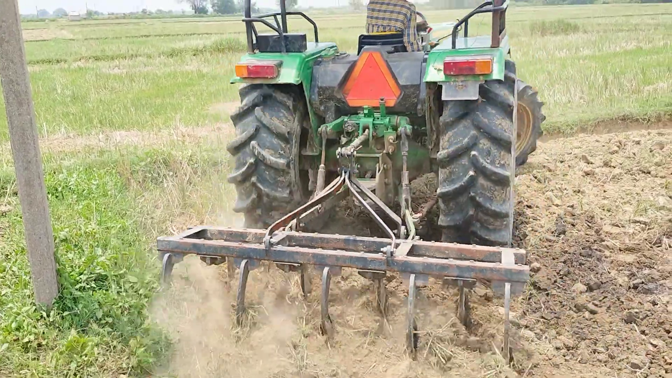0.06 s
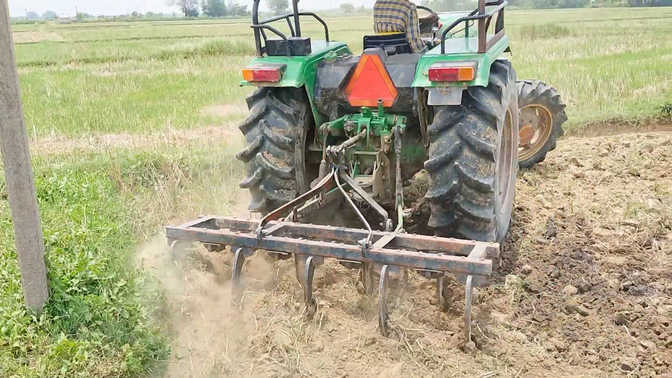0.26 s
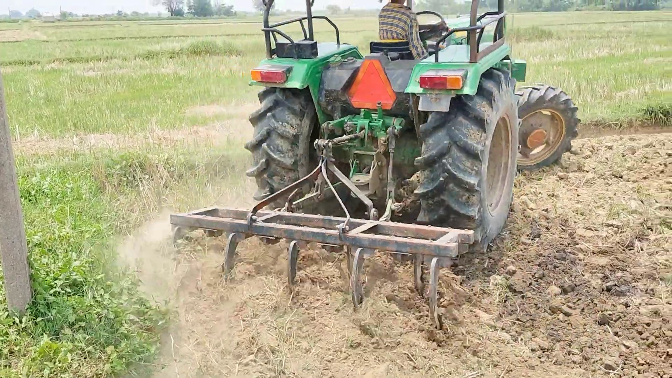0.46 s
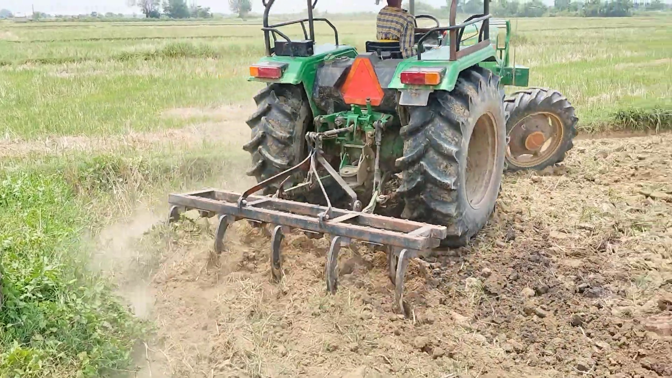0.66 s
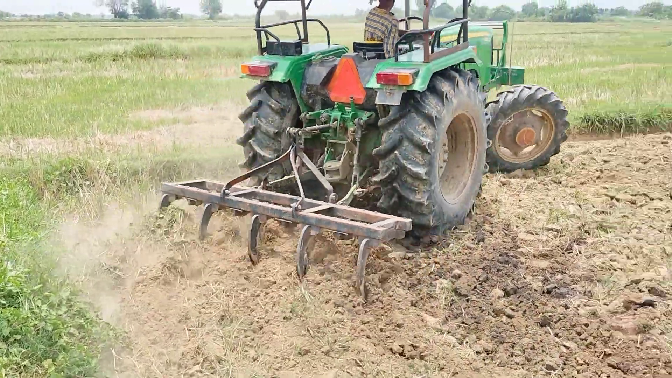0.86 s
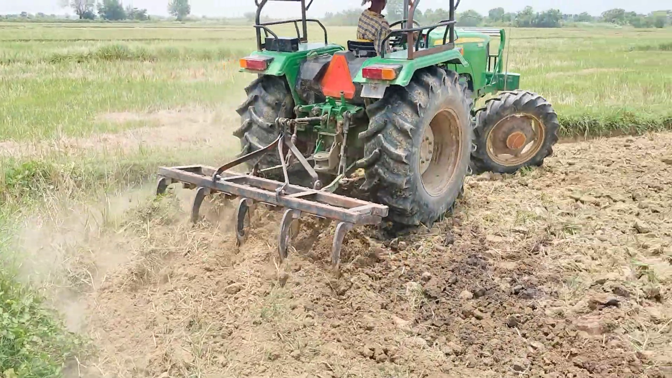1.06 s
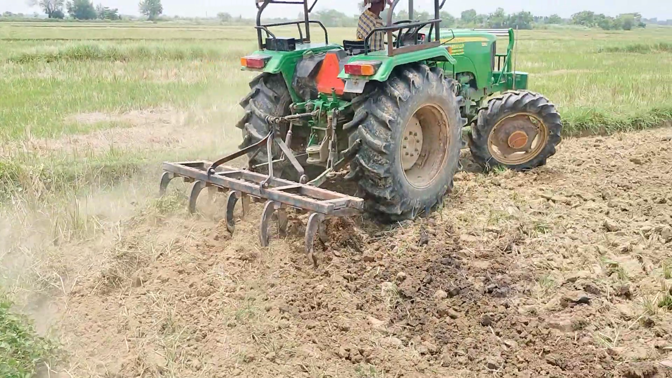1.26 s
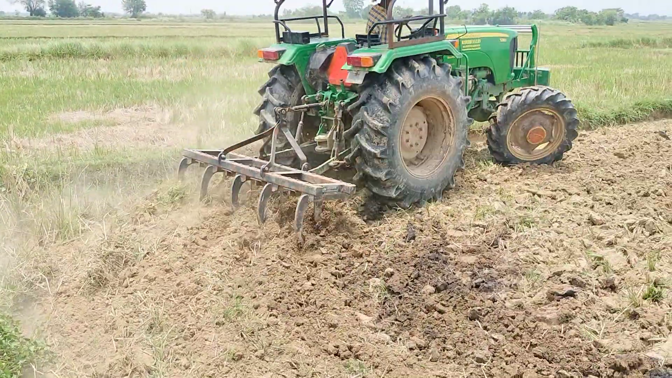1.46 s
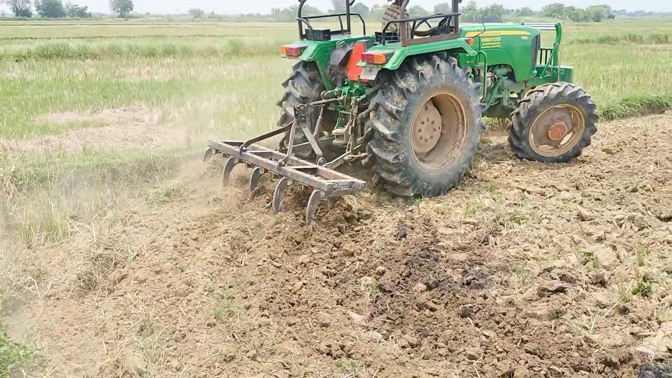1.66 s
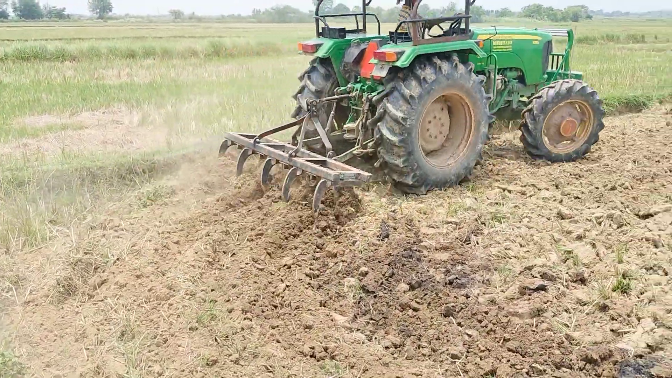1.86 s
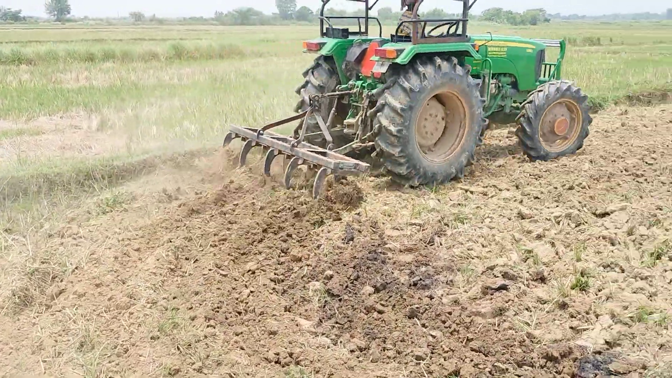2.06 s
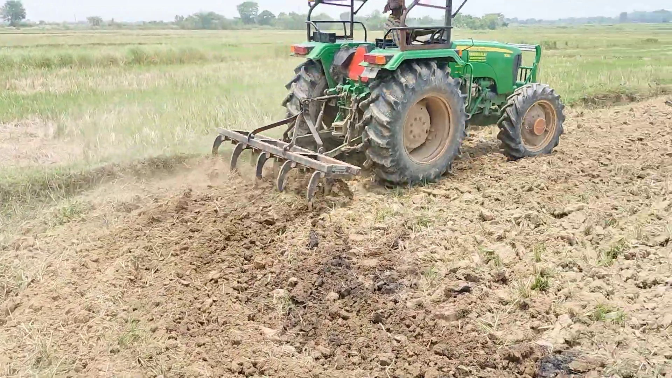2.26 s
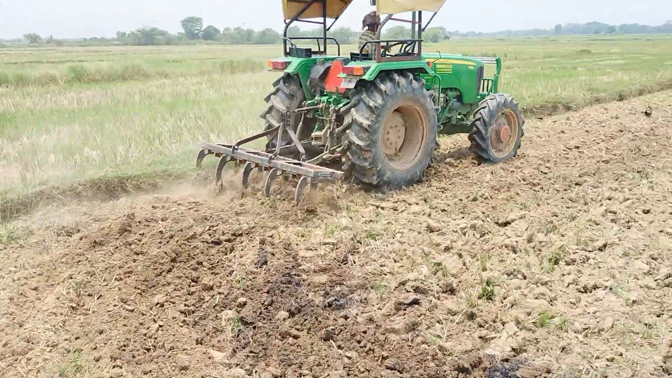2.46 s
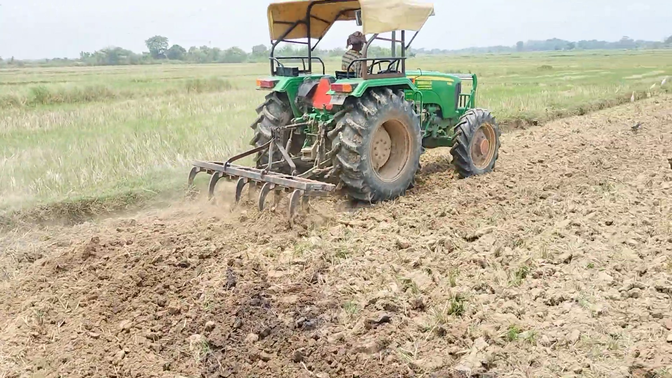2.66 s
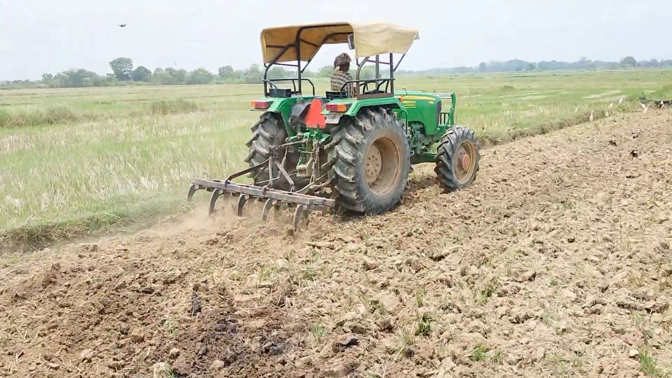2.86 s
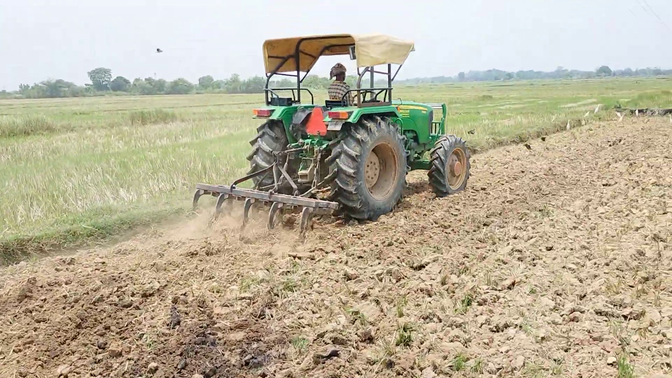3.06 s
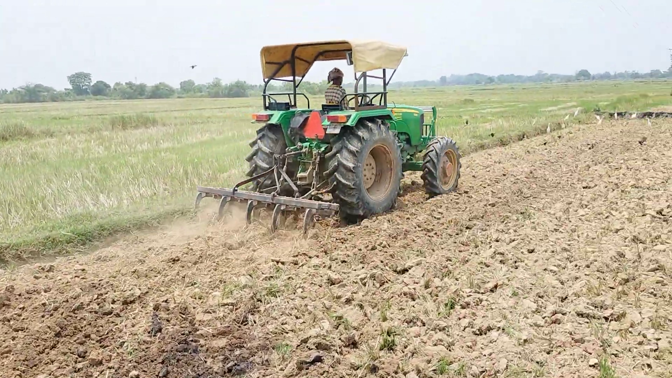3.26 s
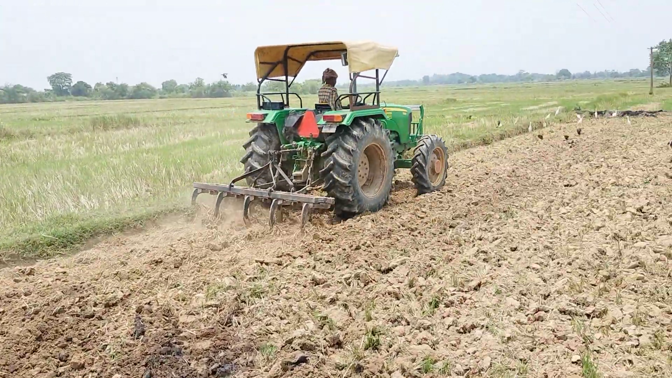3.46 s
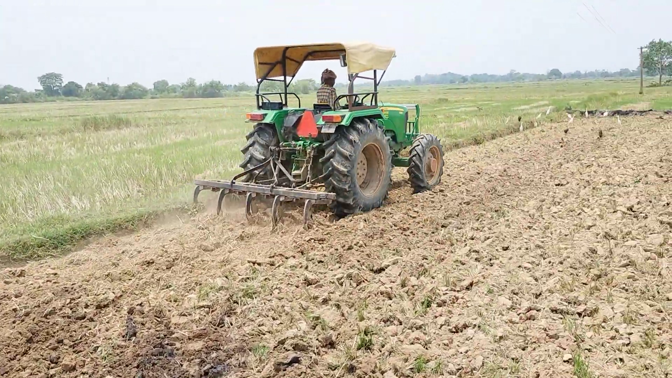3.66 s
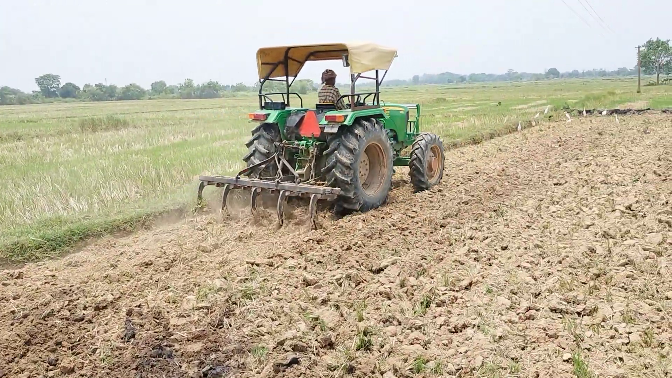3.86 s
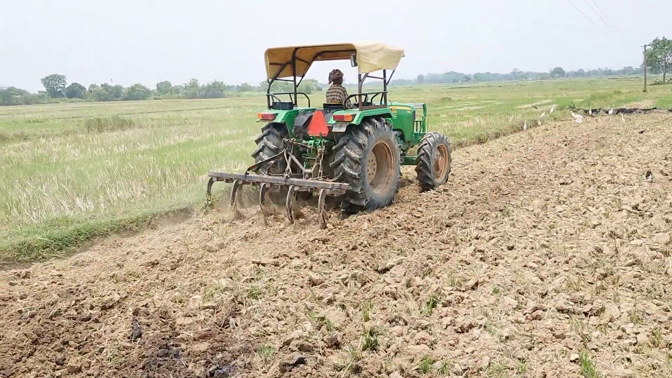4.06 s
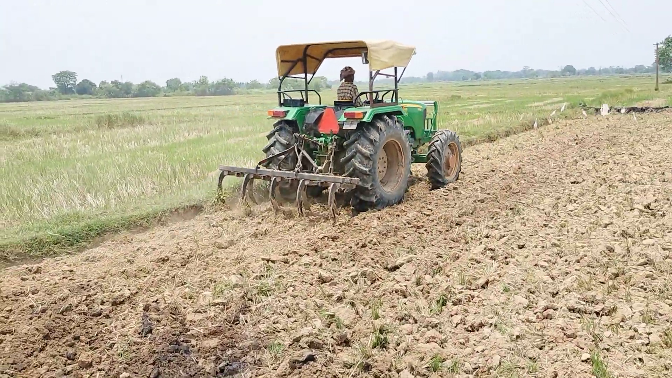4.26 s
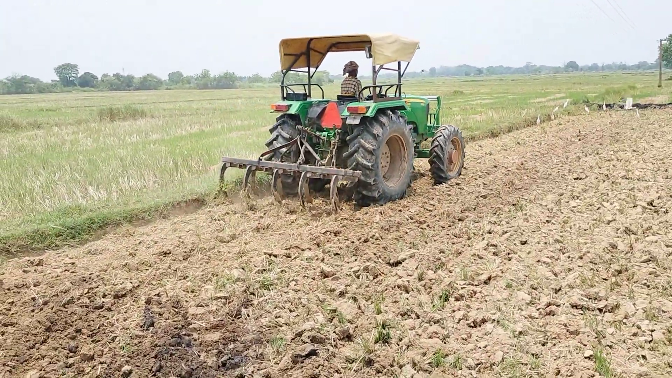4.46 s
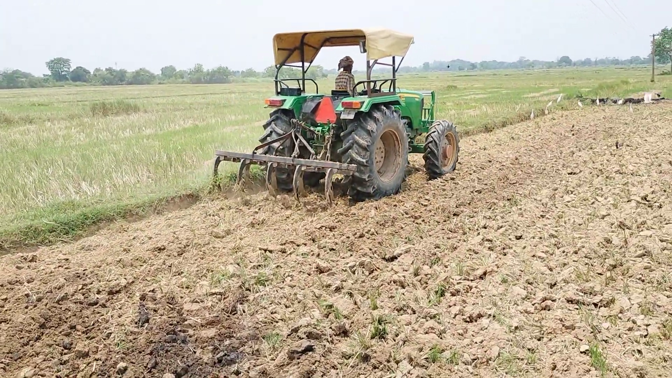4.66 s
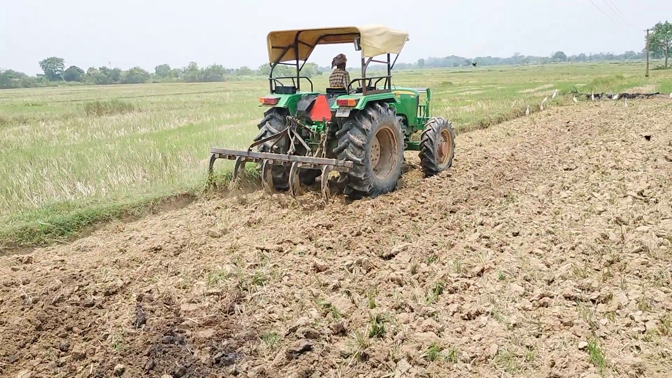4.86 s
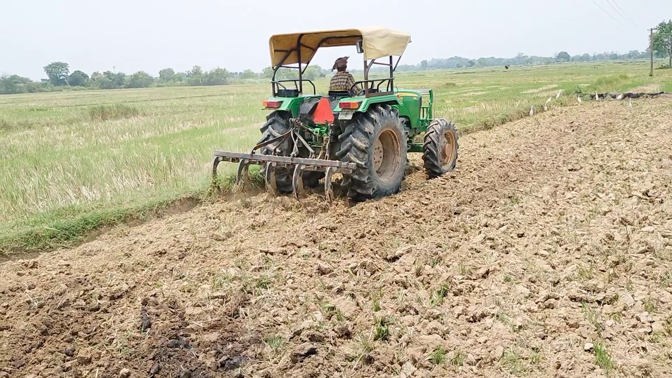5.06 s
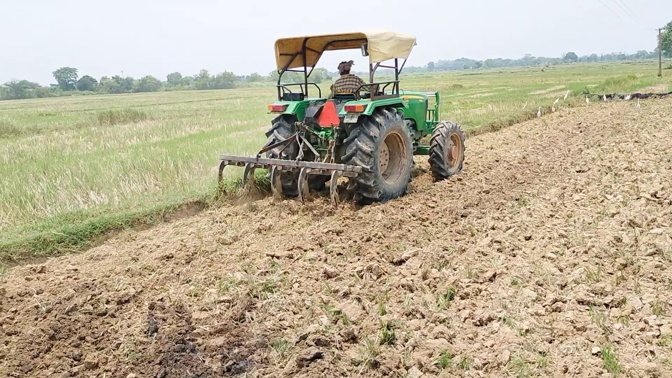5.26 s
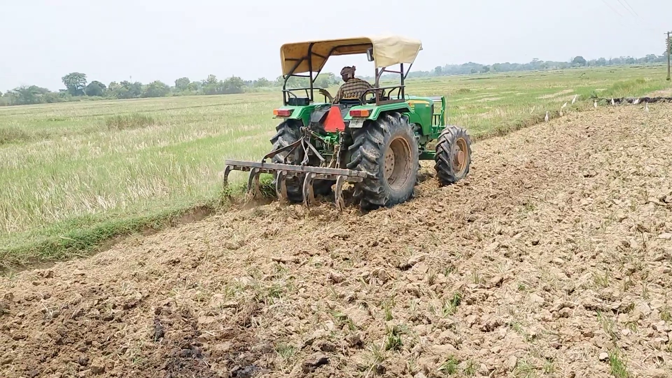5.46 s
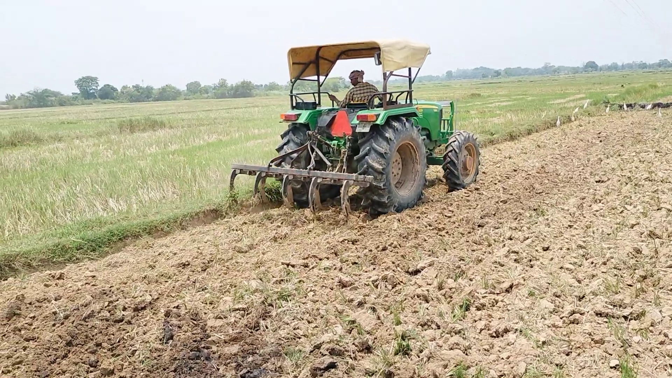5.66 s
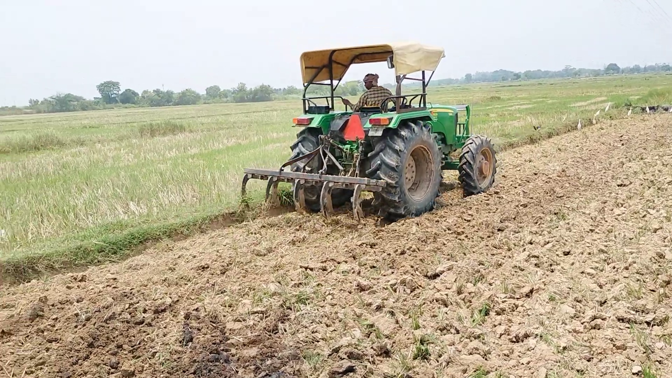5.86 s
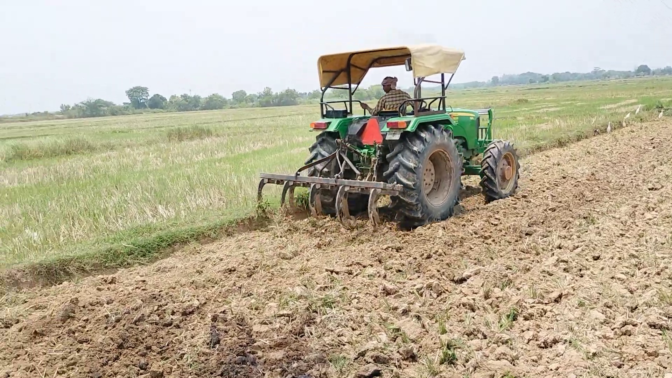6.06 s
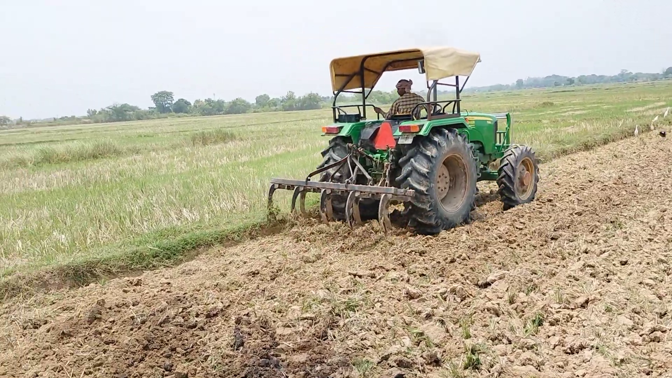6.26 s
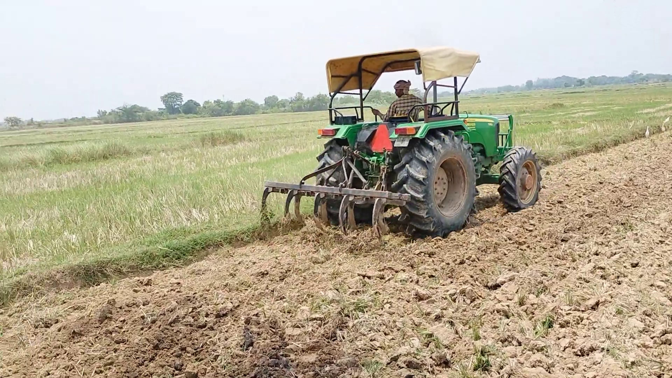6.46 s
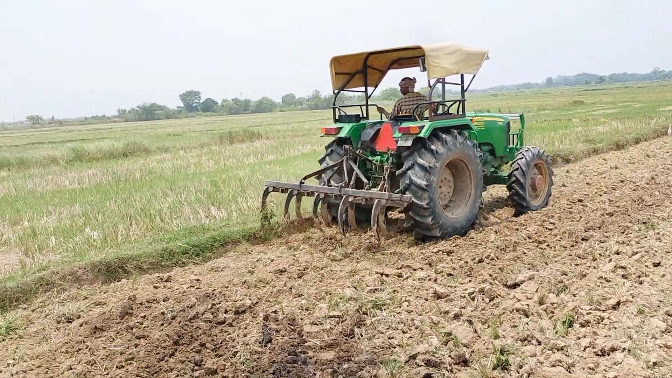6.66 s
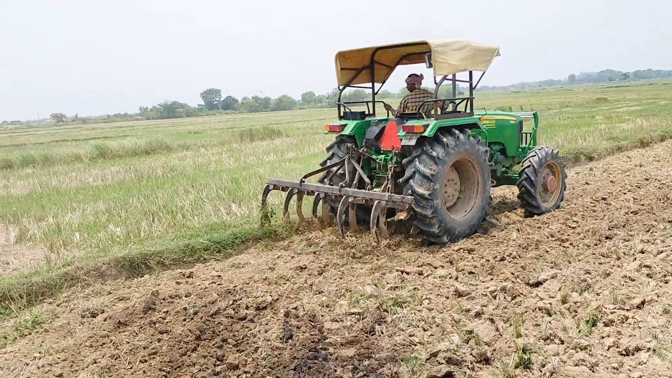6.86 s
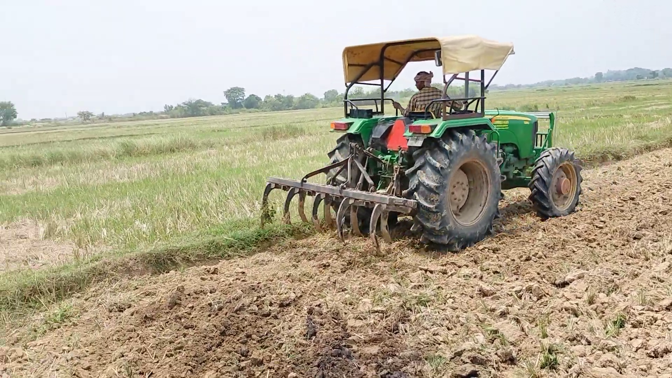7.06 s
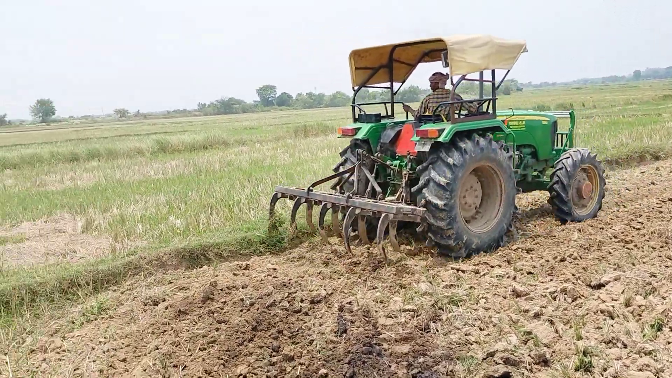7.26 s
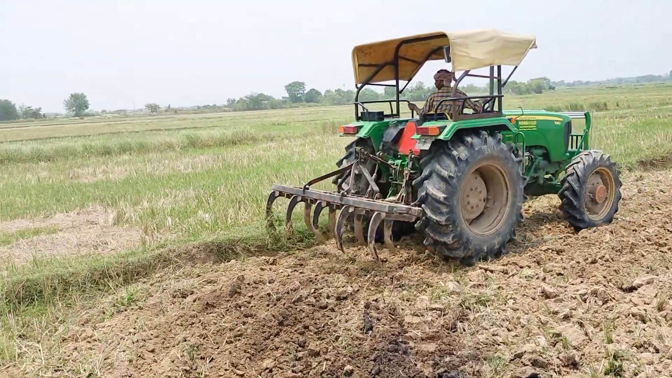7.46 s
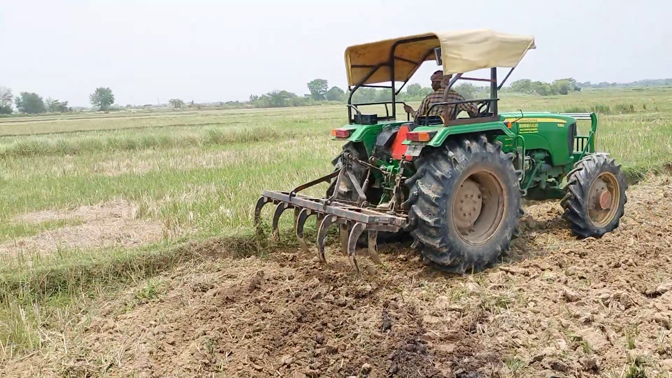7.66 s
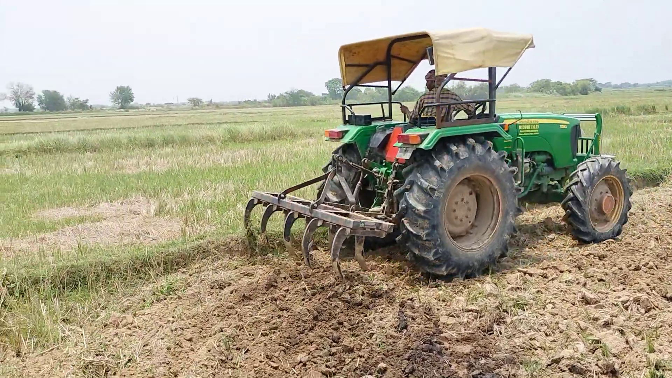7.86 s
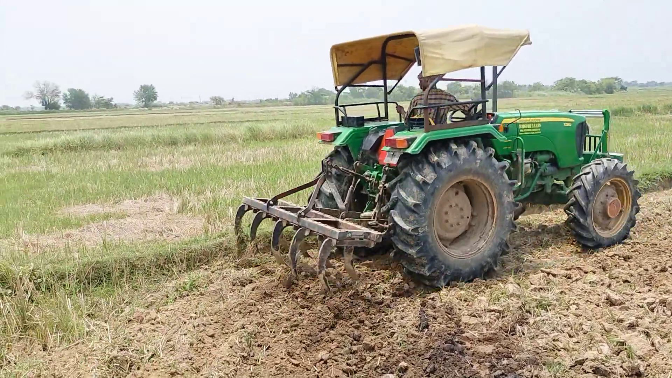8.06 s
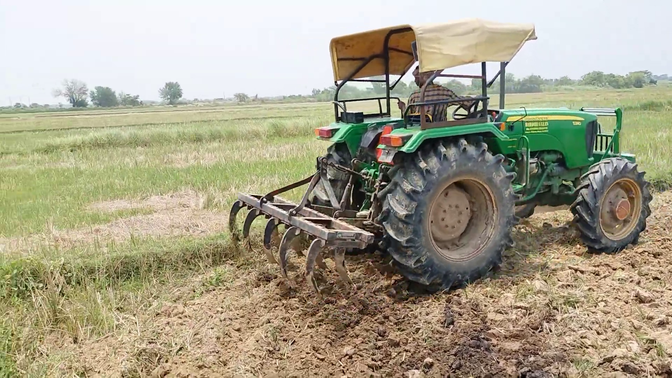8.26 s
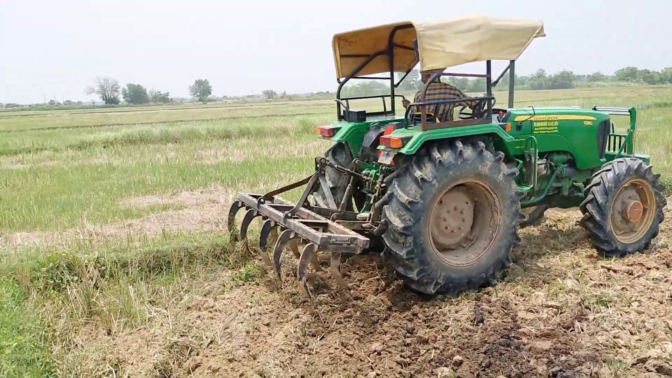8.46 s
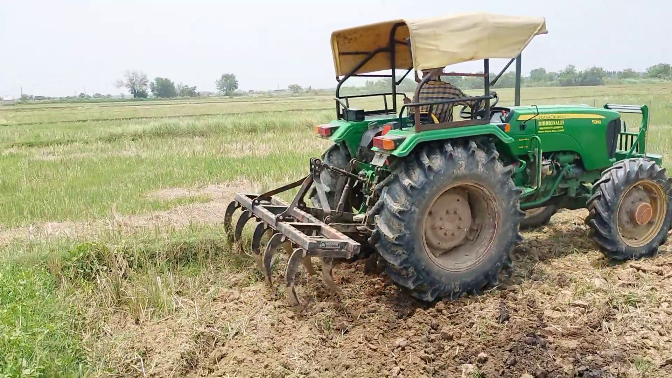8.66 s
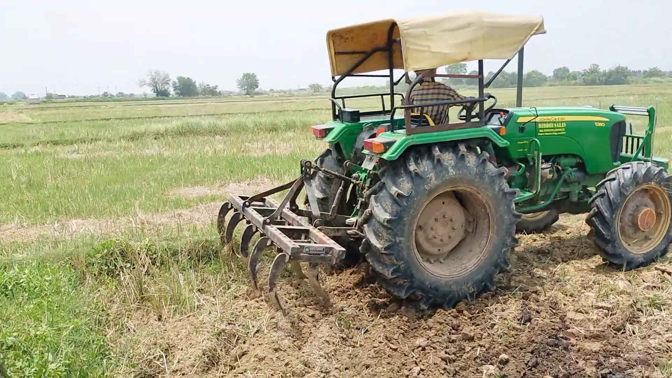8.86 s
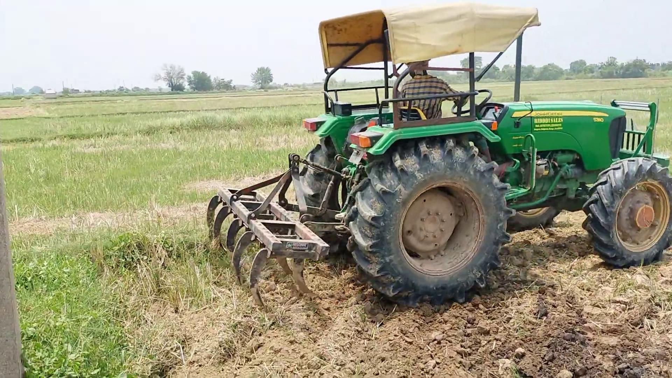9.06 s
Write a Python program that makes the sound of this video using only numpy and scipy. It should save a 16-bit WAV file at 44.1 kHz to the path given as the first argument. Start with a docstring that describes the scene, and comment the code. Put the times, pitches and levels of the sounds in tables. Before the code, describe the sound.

A diesel tractor drones and clatters close by as a cultivator crunches dry soil, then moves off and returns amid wind buffeting and birdsong.

```python
"""Tractor and cultivator on a windy field

Gusts rumble and slap on two microphone ports: shaped noise, plus single damped swings for big eddies.
Small birds whistle, trill and buzz: gliding sines with a weak second harmonic and a short diffuse tail.
A cultivator breaks dry clods (filtered noise bursts), rasps through ringing tines, squeaks and thuds.
A diesel tractor moves off and backs up again: crank-locked sines and rattles with a ground reflection."""
import sys
import numpy as np
from scipy import signal
from scipy.fft import rfft, irfft, next_fast_len
from scipy.io import wavfile
from scipy.ndimage import uniform_filter1d, minimum_filter1d

SR = 44100
rng = np.random.default_rng(int(sys.argv[2]) if len(sys.argv) > 2 else 0)


def wav_record(signal):
    """Record a signal, one row per channel, as 16-bit PCM in the file named by sys.argv[1]."""
    frames = np.transpose(np.atleast_2d(signal))
    bounded = np.clip(frames, -1, 1)
    # unit amplitude maps onto the largest positive 16-bit level
    quanta = np.round(bounded * 32767).astype(np.int16)
    wavfile.write(sys.argv[1], SR, quanta)


N = 401751
TIME = np.arange(N) / SR   # s


def from_db(db):
    """Decibels to gain."""
    return 10 ** (np.asarray(db) / 20)


def rms_one(x):
    """Scale to unit power."""
    return x / np.sqrt(np.mean(x ** 2) + 1e-20)


def in_time(rows):
    """Draw each column of a breakpoint table as a curve over every sample."""
    s, *columns = np.transpose(rows)
    return [np.interp(TIME, s, column) for column in columns]


def at_hz(points, hz):
    """Read a table on a log-frequency axis."""
    f, value = np.transpose(points)
    return np.interp(np.log(hz + 1), np.log(f), value)


def coloured(x, spectrum):
    """Equalise a sound with a spectrum table and bring it to unit power."""
    size = next_fast_len(N)
    gain = from_db(at_hz(spectrum, np.fft.rfftfreq(size, 1 / SR)))
    return rms_one(irfft(rfft(x, size) * gain, size)[..., :N])


def drift(rate_hz):
    """Slow random wander with unit power, drawn every 40 samples and joined by straight lines."""
    step, settle = 40, 2000
    r = np.exp(-2 * np.pi * rate_hz * step / SR)
    draws = rng.standard_normal(N // step + settle + 2)
    slow = signal.lfilter([1], [1, -2 * r, r * r], draws)[settle:]
    return np.interp(np.arange(N) / step, np.arange(len(slow)), rms_one(slow))


def spread(pair, alike):
    """Mix two unrelated sounds into a left and a right of given likeness."""
    c = np.clip(alike, -1, 1)
    middle = np.sqrt((1 + c) / 2) * pair[0]
    side = np.sqrt((1 - c) / 2) * pair[1]
    return middle + side * [[1], [-1]]


def noise(alike):
    """White stereo noise; alike 0 is independent, 1 is mono."""
    return spread(rng.standard_normal((2, N)), alike)


def panned(left_db):
    """Left and right gains of constant power for a left-right level difference."""
    gains = from_db(np.array([[.5], [-.5]]) * left_db)
    return gains / np.sqrt(np.mean(gains ** 2, axis=0))


def delayed(x, ms):
    """Play a sound a little later."""
    return np.interp(TIME - ms / 1000, TIME, x)


def decaying(hits, fall_s):
    """Let every hit die away exponentially; unit power overall."""
    return rms_one(signal.lfilter([1], [1, -np.exp(-1 / (fall_s * SR))], hits + 1e-18))


def bandpass(x, band_hz):
    """Keep one pitch range."""
    return signal.sosfilt(signal.butter(2, band_hz, "band", fs=SR, output="sos"), x)


# large eddies that strike a port:
# [t/s, swing f/Hz, swing level/dB, flutter level/dB, left-right difference/dB]
BUFFETS = [(2.913, 126, -5, -29, 18), (2.964, 149, 0, -21, 21), (3.245, 124, -7.5, -24, 17),
           (3.975, 121, -9, -30, 25), (4.217, 90, -2.5, -13.5, 8), (4.298, 129, 0.5, -18.5, 14),
           (4.322, 38, -2, -24, -18), (4.377, 69.6, -9, -20, 18), (4.427, 253, -6, -10.5, 21),
           (4.564, 60.5, -5, -12, 11), (4.622, 70, 0.5, -22, 20), (4.664, 130, -3, -14.5, 16),
           (4.724, 260, -1.5, -20, 18), (4.83, 91, -7, -17, -3), (4.935, 200, -9, -10.5, 17),
           (4.997, 150, -3, -8, 14), (5.091, 130, 1, -7.5, 17), (5.133, 90, -1, -14, 18),
           (5.262, 61, -4, -26, -18), (5.382, 161, 1.5, -16, 13), (5.621, 79.5, -8, -19.5, -16),
           (5.955, 75.5, -6.5, -15, -13), (6.066, 200, -13, -17, 21), (6.245, 80.6, -2, -13, 6),
           (6.421, 141, 4, -14, 13), (7.046, 66, -7, -24, -25), (7.139, 104, -6.5, -18, 17),
           (7.671, 150, -10, -12.5, 20), (8.124, 60, -8, -22, 24), (8.169, 140, -5, -17, 22)]
# colour of slaps and flutter: [f/Hz, relative level/dB]
SLAP = [(40, -30.5), (150, 3), (300, -1.5), (550, -17), (900, -35.5), (6000, -92.5)]
SWING_DAMPING, FLUTTER_S = 2.8, 0.0086   # decay per cycle, time to the flutter's peak in s


def buffets():
    """A large eddy is a single damped swing of pressure, torn by a short flutter of noise."""
    out, t = np.zeros((2, N)), TIME[:SR // 5]
    flutter = coloured(rng.standard_normal(N), SLAP)
    for s, hz, swing_db, flutter_db, left_db in BUFFETS:
        span = slice(int(s * SR), int(s * SR) + len(t))
        age = SWING_DAMPING * hz * t
        swing = rng.choice([-1, 1]) * age * np.exp(1 - age) * np.sin(2 * np.pi * hz * t)
        tear = flutter[span] * t / FLUTTER_S * np.exp(1 - t / FLUTTER_S)
        sides = panned(left_db)
        eddy = from_db(swing_db) * swing + from_db(flutter_db) * tear
        out[:, span] += eddy * sides / sides.max()
    return out


# wind on each port before gusts and overload: [t/s, rumble level/dB, slap level/dB]
WIND_LEFT = [(2.72, -40, -46), (2.95, -18, -29), (3.12, -16, -27), (3.25, -20, -34), (3.55, -19, -24.5),
             (3.75, -30, -36), (3.88, -18.5, -32), (4.2, -34, -42), (4.23, -13.5, -21), (4.47, -20, -23.5),
             (4.57, -7, -9.5), (4.76, -18, -21.5), (5.08, -11, -14), (5.25, -19, -16.5),
             (5.47, -14.5, -21.5), (5.87, -27.5, -37), (6.28, -11.5, -21.5), (6.44, -14, -19),
             (6.8, -25, -44), (7.55, -36, -47), (7.72, -22, -39), (8.35, -29.5, -40), (8.55, -19.5, -28.5),
             (8.85, -20.5, -31), (9, -47, -55)]
WIND_RIGHT = [(2.35, -44, -61), (2.55, -26, -41), (3, -22.5, -28.5), (3.7, -26, -37), (4.19, -29, -26.5),
              (4.24, -17.5, -23.5), (4.6, -16.5, -21), (4.88, -17, -14.5), (5.15, -17.5, -19.5),
              (5.6, -28, -19), (5.72, -22.5, -23), (5.95, -12.5, -19), (6.07, -18.5, -22.5),
              (6.45, -14, -18), (6.75, -14.5, -21.5), (6.8, -27, -32), (7.5, -52, -57)]
# lulls between the buffets: [t/s, length/s]
LULLS = [(4.48, 0.023), (4.698, 0.034), (4.73, .03), (5.326, .04), (5.725, 0.024), (6.526, .04)]
# colour of the deep rumble: [f/Hz, relative level/dB]
RUMBLE = [(12, -15), (25, -11.5), (45, -3.5), (90, -2), (180, -9.5), (320, -24.5), (900, -60), (4000, -100)]
# colour of the bright edge on the slaps: [f/Hz, relative level/dB]
EDGE = [(150, -32), (400, -1.5), (600, -8.5), (900, -17.5), (1600, -46), (6000, -86.5)]
LULL_DEPTH_DB = 5.5   # before the lull's corners are smoothed
GUSTINESS_DB, GUSTS_HZ = 1.77, 3.1   # spread and rate of the wander
WIND_TOP = .78   # pressure where a port saturates


def wind(lumps_db, slaps_per_s, slap_s, steady, edge_db, edge_growth):
    """Eddies rumble and slap on each port separately; the harder the slaps, the brighter their edge."""
    rumble_db, slap_db = np.stack([in_time(WIND_LEFT), in_time(WIND_RIGHT)], axis=1)
    lulls = sum(1.0 * (TIME > s) * (TIME < s + length) for s, length in LULLS)
    gusts_db = GUSTINESS_DB * np.array([drift(GUSTS_HZ), drift(GUSTS_HZ)])
    gusts_db = gusts_db - LULL_DEPTH_DB * uniform_filter1d(lulls, size=SR // 80)
    lumps = rms_one(from_db(lumps_db * np.array([drift(32), drift(26)])))
    rumble = coloured(noise(0), RUMBLE) * lumps
    hits = (rng.random((2, N)) < slaps_per_s / SR) * rng.uniform(0.91, 1, (2, N))
    eddies = steady + decaying(hits, slap_s)
    force = from_db(slap_db + gusts_db)
    slaps = force * coloured(noise(0) * eddies, SLAP)
    edge = from_db(edge_db) * force ** edge_growth * coloured(noise(0) * eddies, EDGE)
    pressure = from_db(rumble_db + gusts_db) * rumble + slaps + edge + buffets()
    return WIND_TOP * np.tanh(pressure / WIND_TOP)   # the hardest eddies overload the ports


BIRD_ECHO_DB, BIRD_ECHO_S = -6.5, 0.014   # tail level, decay time


def scattered(x):
    """The rough field adds a short, diffuse tail, different at each port."""
    tail = rng.standard_normal((2, SR // 8)) * np.exp(-TIME[:SR // 8] / BIRD_ECHO_S)
    tail = tail / np.sqrt(np.sum(tail ** 2, axis=1, keepdims=True))
    return from_db(BIRD_ECHO_DB) * signal.fftconvolve(x[None], tail, axes=1)[:, :N]


# Bird levels are those of the dry note, before tail and panning.
# gliding whistles: [t/s, length/s, start f/Hz, end f/Hz, level/dB]
WHISTLES = [(2.668, 0.032, 5200, 6100, -33.5), (2.829, 0.13, 2100, 2500, -38),
            (3.223, 0.042, 3100, 2840, -40.5), (3.308, 0.05, 2180, 2570, -41.5),
            (3.594, 0.039, 4020, 3890, -35.5), (3.662, 0.051, 4180, 4030, -38),
            (3.692, 0.03, 3630, 3870, -34.5), (3.732, 0.072, 3000, 2860, -42.5),
            (3.779, 0.15, 1976, 2630, -40.5), (3.949, 0.078, 2910, 2570, -41.5),
            (4.535, 0.043, 3000, 2870, -49), (5.375, 0.053, 3000, 2600, -46),
            (5.613, 0.036, 3900, 3930, -42.5), (5.685, 0.058, 3810, 3870, -41),
            (5.928, 0.039, 4630, 4620, -37), (6.006, .04, 3630, 3480, -33.5),
            (6.193, 0.068, 4130, 3880, -42), (6.203, 0.013, 3340, 3020, -37), (6.24, .034, 7200, 3630, -46),
            (6.27, 0.047, 3300, 2730, -44), (6.804, 0.13, 3050, 3640, -35.5), (6.858, .13, 3790, 3970, -42),
            (6.912, .03, 5700, 4950, -39), (6.928, 0.07, 4860, 4600, -35.5),
            (7.431, 0.058, 2930, 2890, -33), (7.622, .057, 1980, 2100, -36), (8.113, 0.17, 2320, 3100, -39),
            (8.232, 0.092, 3280, 3165, -31), (8.507, 0.088, 3340, 2810, -35),
            (8.881, 0.033, 2750, 2345, -41), (8.952, 0.081, 2330, 2650, -48)]
# trills, each pulse gliding onto one note from above (+) or below (-):
# [t/s, length/s, f/Hz, level/dB, pulse rate/Hz, leap as a share of pitch]
TRILLS = [(5.326, 0.044, 4320, -37, 66, 1), (5.651, 0.039, 4000, -40, 54, -.3),
          (5.965, 0.055, 3930, -37, 48, -0.6), (6.843, 0.02, 4430, -40, 100, -.2),
          (7.511, 0.077, 3570, -33, 41, .4), (8.797, 0.047, 3410, -35, 91, -0.44),
          (8.863, 0.023, 3340, -31, 50, 0.75)]
# harsh buzzes: [t/s, length/s, centre f/Hz, level/dB]
BUZZES = [(3.912, 0.053, 5400, -47), (5.155, 0.047, 4940, -49), (5.55, 0.055, 4900, -50),
          (6.061, 0.046, 5460, -44), (6.128, 0.085, 3920, -44), (6.512, 0.055, 5670, -51),
          (8.191, 0.046, 4000, -41), (9.028, 0.044, 4660, -50)]
# strength of the second harmonic: [f/Hz of that harmonic, level/dB against the fundamental]
OVERTONE = [(6500, -23), (7500, -18), (7900, -16), (8600, -14), (9300, -39), (11000, -31)]
TRILL_SETTLE = .2   # time constant of the glide, as a share of a pulse
BUZZ_HZ, BUZZ_DEPTH = 75, 0.26   # sweep rate, sweep up and down as a share of pitch
BIRD_WOBBLE, BIRD_FLUTTER_DB = 0.011, 3.5   # spread of pitch as a share, spread of level
PULSE_UNEVEN = 0.1   # spread of the pulse rate, as a share


def birds():
    """Whistles glide, trills glide onto their note again and again, buzzes sweep down in uneven pulses."""
    out = np.zeros(N)
    waver, flutter = drift(100), from_db(BIRD_FLUTTER_DB * drift(80))

    def during(s, length):
        """The samples of one note."""
        return slice(int(s * SR), int(s * SR) + int(length * SR))

    def pulsing(span, per_s):
        """Position 0-1 within each uneven pulse."""
        return np.cumsum(per_s * (1 + PULSE_UNEVEN * waver[span])) / SR % 1

    def add(span, hz, db, envelope):
        """Sing one note with a weak second harmonic."""
        cycles = np.cumsum(hz * (1 + BIRD_WOBBLE * waver[span])) / SR
        phase = 2 * np.pi * cycles + np.cumsum(rng.normal(0, 0.038, len(hz)))
        tone = np.sin(phase) + from_db(at_hz(OVERTONE, 2 * hz)) * np.sin(2 * phase)
        out[span] += from_db(db) * rms_one(tone * envelope * flutter[span])

    for s, length, start, end, db in WHISTLES:
        size = int(length * SR)
        add(during(s, length), np.geomspace(start, end, size), db, signal.windows.tukey(size, .6))
    for s, length, hz, db, per_s, leap in TRILLS:
        span = during(s, length)
        sweep = pulsing(span, per_s)
        glide = hz * (1 + leap * np.exp(-sweep / TRILL_SETTLE))
        add(span, glide, db, np.sin(np.pi * sweep ** 2) * signal.windows.tukey(len(sweep), .15))
    for s, length, hz, db in BUZZES:
        span = during(s, length)
        sweep = pulsing(span, BUZZ_HZ)
        fall = hz * (1 + BUZZ_DEPTH * (1 - 2 * sweep))
        add(span, fall, db, np.sin(np.pi * sweep) * signal.windows.tukey(len(sweep)))
    both_ports = np.array([out, delayed(out, 0.054)])
    return (both_ports + scattered(out)) * panned(-4.0)


# the tractor moves off and backs up again: [t/s, distance/m]
DISTANCE = [(0, 4.18), (1, 4.6), (1.6, 4.9), (2.7, 5.1), (3.5, 8.2), (4.7, 11.7), (5.5, 6.5), (6.3, 5.52),
            (7.2, 5.62), (8, 5.5), (9.11, 5.73)]
# how hard the tines work in the ground: [t/s, load 0-1]
LOAD = [(0, 1), (.75, 0.93), (1.15, 0.81), (2, 0.67), (2.45, 0.39), (4, 0.09), (7.3, 0.38), (8, 0.07),
        (9.11, 0.06)]
# crankshaft speed: [t/s, turn rate f/Hz]
SPEED = [(0, 29.5), (.3, 30.3), (.53, 28.6), (.7, 29.4), (.9, 27.7), (1.1, 27.9), (1.6, 32.1), (1.95, 31),
         (2.2, 33), (2.45, 31.4), (3.1, 35.2), (5, 34.5), (6, 29.6), (6.9, 32.3), (7.55, 32.9), (7.8, 34.6),
         (8.3, 34), (9.11, 34)]
USUAL_M, USUAL_TURNS_PER_S = 6, 32


def loudness(rule):
    """Gain of one part of the rig from its distance, load and engine speed."""
    db, distance_db, load_db, speed_db = rule
    (metres,), (load,), (speed,) = in_time(DISTANCE), in_time(LOAD), in_time(SPEED)
    lost_db = distance_db * np.log2(metres / USUAL_M)
    return from_db(db - lost_db + load_db * load + speed_db * (speed - USUAL_TURNS_PER_S))


# colour of the breaking soil: [f/Hz, relative level/dB]
SOIL = [(600, -10), (1500, 3.5), (3000, 5.5), (5000, -8), (7000, -12.5), (9000, -30.5), (11500, -22),
        (16000, -25)]
# pitch ranges of large to tiny clods: [lowest f/Hz, highest f/Hz]
CLOD_BANDS = [(200, 2200), (2200, 4000), (4000, 6500), (6500, 18000)]
# soil loudness: [level/dB at usual distance and speed without load, loss/dB per doubling of distance,
# gain/dB at full load, gain/dB per extra turn per s]
SOIL_LEVEL = (-41.5, 10, 4, 1.28)


def soil(clods_per_s, size_db, crumble_s, hiss):
    """Dry clods snap and crumble in milliseconds, each in the pitch range of its size, over dust hiss."""
    load, = in_time(LOAD)
    busy = load ** 2 * from_db(4.5 * drift(10))   # more clods break while the tines are deep
    out = 0
    for band in CLOD_BANDS:
        born = rng.random(N) < clods_per_s * busy / SR
        snaps = born * from_db(size_db * np.minimum(rng.exponential(1, N), 3))
        out = out + bandpass(noise(0.032) * (decaying(snaps, crumble_s) + hiss), band)
    return loudness(SOIL_LEVEL) * coloured(out, SOIL)


def bursts(rows, rise_s, fall_s):
    """Envelope of contacts that rise quickly, hold and die away."""
    out = np.zeros(N)
    for s, length, db in rows:
        start = int(s * SR)
        t = TIME[:N - start][:SR]
        fall = np.exp(-np.maximum(t - length, 0) / fall_s)
        out[start:][:len(t)] += from_db(db) * (1 - np.exp(-t / rise_s)) * fall
    return out


def crackle(ragged_db, rate_hz):
    """Chips of every size break off at their own moments, so each band flares separately."""
    edges = np.geomspace(500, 16000, 11)
    chips = 0
    for band in zip(edges, edges[1:]):
        flare = from_db(ragged_db * np.minimum(drift(rate_hz), 1.5))
        chips = chips + bandpass(noise(0), band) * flare
    return rms_one(chips)


def resonance(x, hz, width):
    """Ring a two-pole band-pass with unit gain on top."""
    r = np.exp(-np.pi * width / SR)
    feedback = [1, -2 * r * np.cos(2 * np.pi * hz / SR), r * r]
    return signal.lfilter((1 - r * r) / 2 * np.array([1, 0, -1]), feedback, x)


# tines scraping through hard clods: [t/s, hold length/s, relative level/dB]
SCRAPES = [(.235, 0.034, -30), (.28, 0.055, -30.5), (.5, 0.024, -29), (.538, 0.0075, -27.5),
           (.662, 0.0068, -22.5), (1.248, 0.013, -30), (1.315, 0.0089, -32), (1.522, 0.0099, -22.5),
           (1.541, 0.0076, -21.5), (1.552, 0.018, -35), (1.698, 0.013, -28.5), (1.888, 0.0045, -30.5),
           (1.975, 0.042, -30.5), (4.035, 0.051, -33.5)]
# colour of the scrape: [f/Hz, relative level/dB]
SCRAPE = [(600, 12.5), (1500, 4), (2600, 9.5), (4700, 1.5), (6000, -4), (7500, -10), (9000, -39),
          (11000, -16.5), (16000, -49)]
# ringing modes of the spring tines: [f/Hz, width/Hz, relative level/dB]
TINES = [(1800, 76, 7), (2545, 26, 11.5), (3480, 40, 5), (3850, 170, -1), (5040, 26, -7), (5700, 43, -14)]
# steel joints squeaking: [t/s, length/s, f/Hz, peak level/dB]
SQUEAKS = [(0.272, 0.038, 9100, -45), (0.467, 0.12, 2510, -31.5), (0.535, 0.013, 5450, -33),
           (0.701, 0.062, 2580, -34), (0.801, 0.069, 2570, -31), (1.464, 0.13, 4700, -39),
           (1.63, 0.027, 5370, -27.5)]
# dull thuds of the frame: [t/s, hold length/s, level/dB]
THUDS = [(.185, 0.097, -17.5), (1.366, 0.012, -19.5), (1.4, 0.0087, -25), (1.896, 0.0068, -16.5)]
# colour of the thuds: [f/Hz, relative level/dB]
FRAME = [(50, 11), (150, -1), (240, 11.5), (370, 7), (520, 0), (700, -13), (1000, -3), (2000, -24),
         (8000, -72)]
TINE_CHANGE_DB = 5.5   # spread of each mode's wandering level


def cultivator():
    """Gritty noise rasps and rings the tine modes, joints squeak as wavering sines, the frame thuds."""
    grit = crackle(ragged_db=6.0, rate_hz=87) * bursts(SCRAPES, rise_s=0.00088, fall_s=0.01)
    ringing = 0
    for hz, width, db in TINES:
        ringing = ringing + from_db(db + TINE_CHANGE_DB * drift(2.9)) * resonance(grit, hz, width)
    rasp = 0.49 * rms_one(ringing) + 1.19 * coloured(grit, SCRAPE)
    thuds = coloured(noise(0.99), FRAME) * bursts(THUDS, rise_s=0.0004, fall_s=0.015)
    squeaks = np.zeros(N)
    for s, length, hz, db in SQUEAKS:
        size = int(length * SR)
        slip = np.cumsum(rng.normal(0, 0.075, size))   # stick and slip blur the pitch
        tone = np.sin(2 * np.pi * hz * TIME[:size] + slip)
        squeaks[int(s * SR):][:size] += from_db(db) * signal.windows.tukey(size) * tone
    return rasp * np.std(grit) + squeaks + thuds


def combustion(turns, spectrum, rough, throb_db, alike):
    """A rattle that recurs every two turns, mixed with fresh turbulence, swelling with the strokes."""
    size = 2700   # noise steps in one two-turn cycle
    cycle = rng.standard_normal((2, size))[:, (turns / 2 % 1 * size).astype(int)]
    source = np.sqrt(1 - rough) * spread(cycle, alike) + np.sqrt(rough) * noise(alike)
    strokes = np.cos(2 * np.pi * turns) + 0.69 * np.cos(4 * np.pi * turns)
    return coloured(source * from_db(throb_db * strokes), spectrum)


# lag of the ground reflection: [t/s, lag/ms]
GROUND = [(0, 0.93), (1, 0.95), (2, 0.85), (3, 0.847), (4, 0.95), (5, 1.14), (6, 1.193), (7, 1.093),
          (8, 0.896), (9.11, 0.854)]


def over_ground(x, bounce):
    """The soil returns a duller copy, which carves moving notches into the sound."""
    lag_ms, = in_time(GROUND)
    echo = signal.sosfilt(signal.butter(1, 9000, fs=SR, output="sos"), x)
    return rms_one(x + bounce * np.array([delayed(side, lag_ms) for side in echo]))


# crank orders: [multiple of crank speed, level/dB heavily loaded, level/dB lightly loaded]
ORDERS = [(1, -7, -6.5), (2, 1, 0.5), (3, 1.5, -8), (4, -31.5, -7), (5, -41.5, -5.5), (6, -16.5, -19.5),
          (8, -0.5, -34.5), (12, -8.5, -20), (16, -3.5, -52)]


def drone(turns, waver_db):
    """Low crank orders sound as sines; their balance shifts with the load."""
    load, = in_time(LOAD)
    out = 0
    for order, heavy_db, light_db in ORDERS:
        level = from_db(light_db + load * (heavy_db - light_db) + waver_db * drift(5.0))
        out = out + np.sqrt(2) * level * np.sin(2 * np.pi * (order * turns + rng.random()))
    return out * panned(3.5 - 4 * load)


# gear whine before its flutter: [t/s, level/dB]
WHINE = [(0, -30), (.13, -41), (.32, -30.5), (.5, -31), (.59, -44), (.68, -29.5), (1, -42.5), (1.5, -38),
         (2.05, -40), (2.17, -46), (3, -49.5), (9.11, -65.5)]
WHINE_PER_TURN = 19.38   # mesh cycles in one turn of the crank


def gear_whine(turns, flutter_db):
    """A mesh tone geared to the crankshaft, strongest early on and fading away."""
    level_db, = in_time(WHINE)
    phase = 2 * np.pi * WHINE_PER_TURN * turns + 0.42 * drift(6.5)
    level = from_db(level_db + flutter_db * drift(22.0))
    return np.sqrt(2) * np.sin(phase) * level * panned(-2)


# lead of the left microphone port: [t/s, lead/ms]
BEARING = [(0, 0.17), (2.3, 0.2), (4, 0.11), (6, 0.082), (9.11, 0.051)]
# colours of exhaust, knock and clatter: [f/Hz, relative level/dB]
EXHAUST = [(60, -17.5), (110, 6), (170, -3), (250, 2.5), (380, 3), (500, -2), (700, -16.5), (1200, -28),
           (6000, -83.5)]
KNOCK = [(250, -38.5), (500, -7), (750, 5.5), (950, 3), (1300, 0.5), (1700, -17.5), (2500, -12),
         (8000, -69)]
CLATTER = [(900, 4), (1500, 2.5), (2000, 14.5), (2700, 8.5), (3500, 8), (4300, -10.5), (5500, -11),
           (7200, -43.5), (8700, -70), (11000, -31), (16000, -39.5)]
# loudness of each part: [level/dB at usual distance and speed without load,
# loss/dB per doubling of distance, gain/dB at full load, gain/dB per extra turn per s]
DRONE_LEVEL = (-27, 2, -4, -0.58)
EXHAUST_LEVEL = (-35, 12, 5.5, 0.35)
KNOCK_LEVEL = (-34.5, 9, -2, 0.37)
CLATTER_LEVEL = (-36, 6.5, -5.5, 0.78)


def tractor():
    """Drone, exhaust, knock, clatter and whine follow the crankshaft, reaching the left port first."""
    speed, = in_time(SPEED)
    turns = np.cumsum(speed * (1 + .003 * drift(6))) / SR
    exhaust = over_ground(combustion(turns, EXHAUST, rough=0.67, throb_db=2.0, alike=1.0), bounce=0.18)
    knock = over_ground(combustion(turns, KNOCK, rough=0.79, throb_db=1.3, alike=0.83), bounce=0.41)
    clatter = over_ground(combustion(turns, CLATTER, rough=0.63, throb_db=1.8, alike=0.64), bounce=0.41)
    hum = loudness(DRONE_LEVEL) * drone(turns, waver_db=2.0) + gear_whine(turns, flutter_db=2.9)
    block = loudness(KNOCK_LEVEL) * knock + loudness(CLATTER_LEVEL) * clatter
    left, right = hum + loudness(EXHAUST_LEVEL) * exhaust + block
    lead_ms, = in_time(BEARING)
    return np.array([left, delayed(right, lead_ms)])


# tonal balance between the microphone ports: [f/Hz, left-right difference/dB]
PORTS = [(300, -1), (700, 2), (1300, -5), (2300, -5.5), (3200, -9), (4400, -1), (6000, -0.5), (8000, 7.5),
         (15000, -2)]


def ports(x):
    """Each microphone port has its own colour."""
    size = next_fast_len(N)
    gains = panned(at_hz(PORTS, np.fft.rfftfreq(size, 1 / SR)))
    return irfft(rfft(x, size) * gains, size)[:, :N]


def scene():
    """The field through both ports, with wind on them and a faint even hiss."""
    breeze = wind(lumps_db=0.5, slaps_per_s=90, slap_s=0.0039, steady=.25, edge_db=-2.5, edge_growth=1.454)
    crumbling = soil(clods_per_s=240, size_db=4.5, crumble_s=0.004, hiss=2.03)
    field = birds() + crumbling + cultivator() + tractor()
    return ports(field) + breeze + from_db(-81) * noise(0)


LOW_CUT_HZ, CUTOFF_HZ = 20, 15800


def record(dry):
    """The deepest bass is lost; a smooth limiter ducks the strongest peaks; the top is cut."""
    heard = signal.sosfilt(signal.butter(4, LOW_CUT_HZ, "high", fs=SR, output="sos"), dry)
    room = np.minimum(.85 / (np.abs(heard).max(axis=0) + 1e-9), 1)   # gain that keeps peaks to .85
    hold = SR // 50
    ducked = minimum_filter1d(room, 2 * hold)
    gain = uniform_filter1d(uniform_filter1d(ducked, hold), hold)
    return signal.sosfilt(signal.ellip(12, .1, 80, CUTOFF_HZ, fs=SR, output="sos"), heard * gain)


dry = scene()
out = record(dry)
wav_record(out)
```